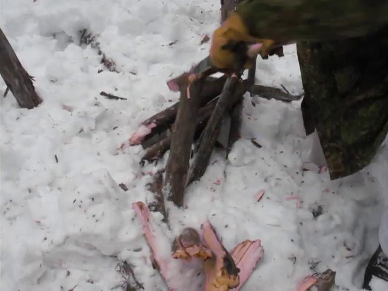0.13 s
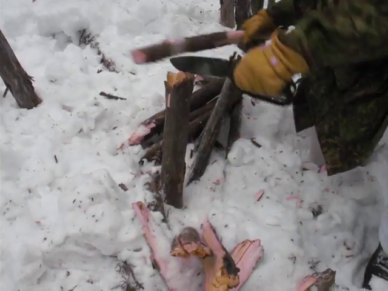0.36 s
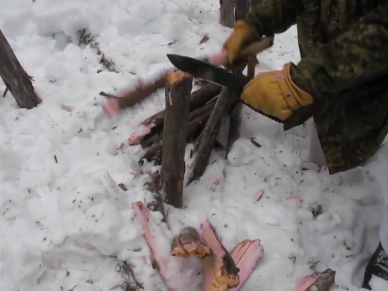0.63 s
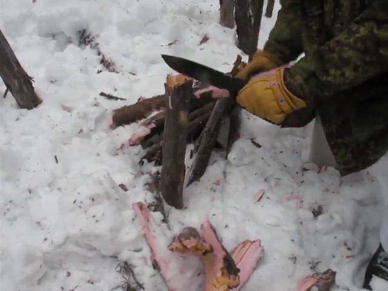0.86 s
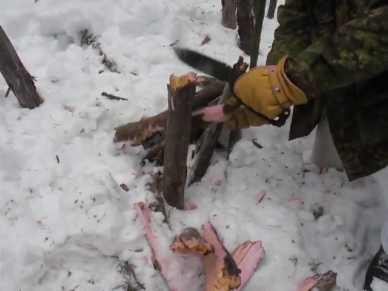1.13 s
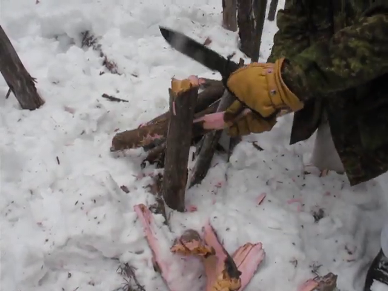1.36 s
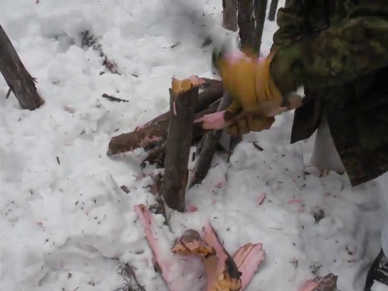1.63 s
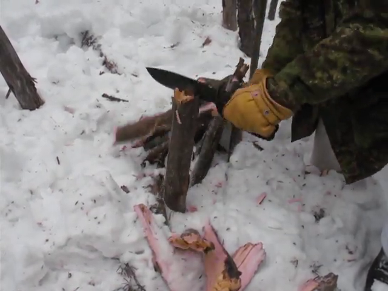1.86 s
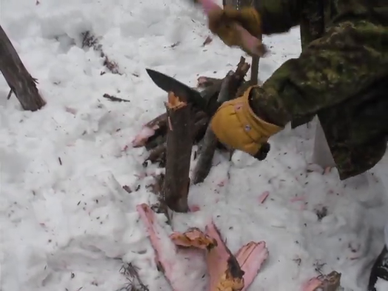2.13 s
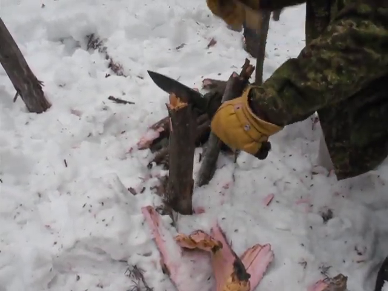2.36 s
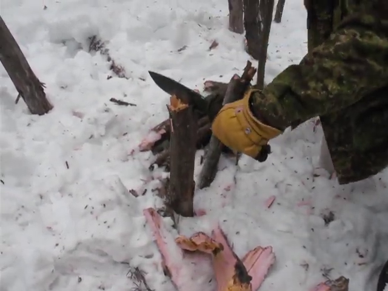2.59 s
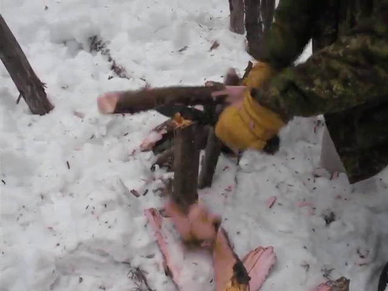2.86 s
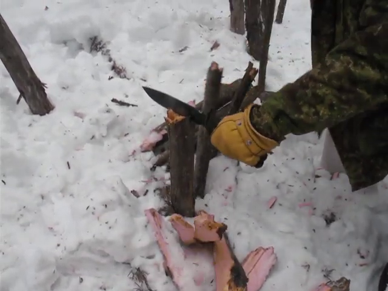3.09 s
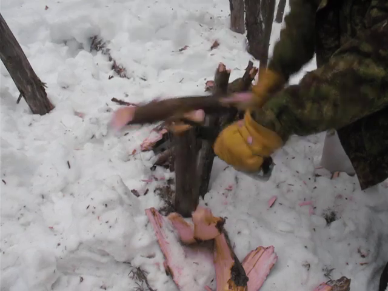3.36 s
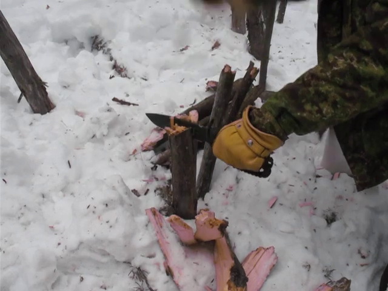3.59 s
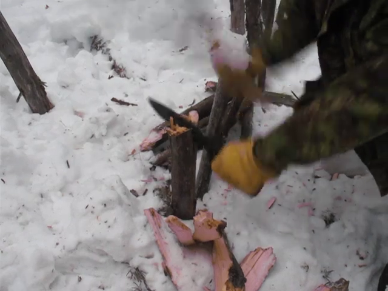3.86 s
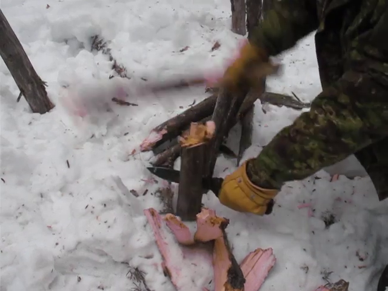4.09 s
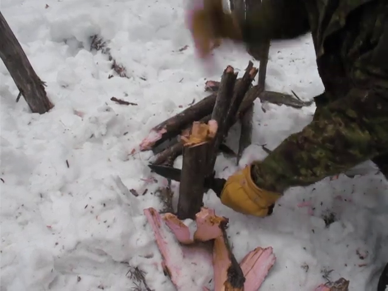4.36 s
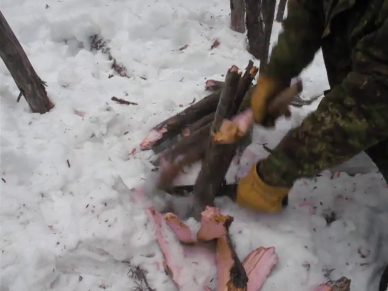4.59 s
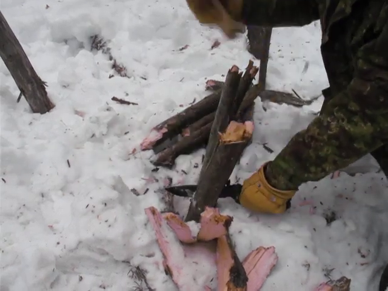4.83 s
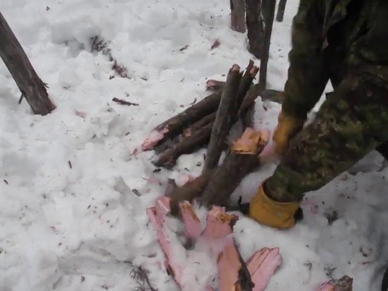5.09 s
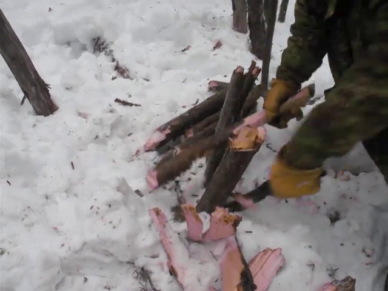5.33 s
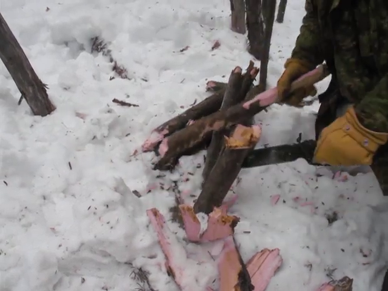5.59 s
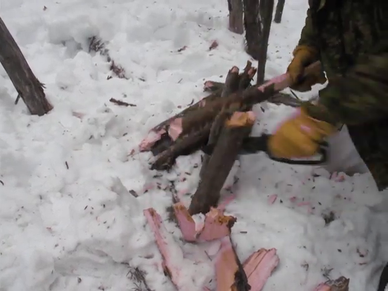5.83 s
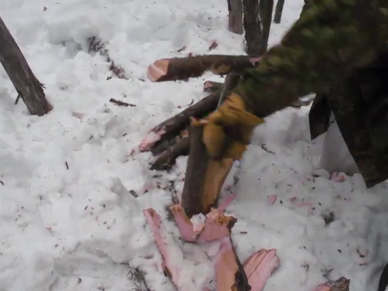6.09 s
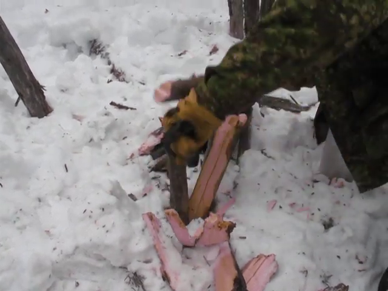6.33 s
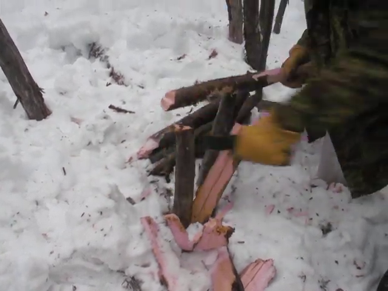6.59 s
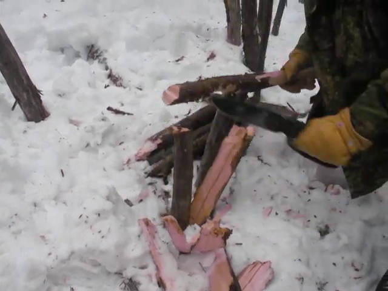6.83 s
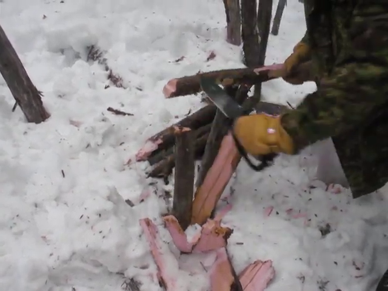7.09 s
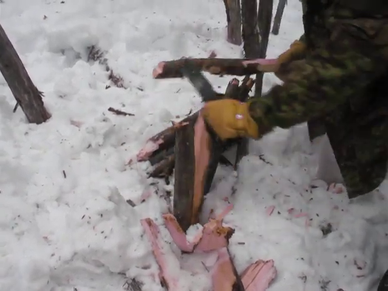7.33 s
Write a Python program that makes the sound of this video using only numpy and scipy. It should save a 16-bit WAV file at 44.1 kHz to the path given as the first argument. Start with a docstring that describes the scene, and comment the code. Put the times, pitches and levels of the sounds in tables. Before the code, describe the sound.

A stick batons a knife through a short log in snow: two light taps, five hard cracking blows, then splintering fibres and glove rustle.

```python
"""Open snowy ground, without echo: a gloved hand batons a large knife down through a short log near a camera.
Two light taps set the blade, then five blows follow, as rough contact noise, decaying log and steel modes and
a thud; the hardest overload the input. Fibres snap as short resonant bursts, bark and cloth crackle in random
ticks, sleeves and gloves rustle as grainy noise, a loose half rings when tapped, and soft thumps land on snow.
A low patter, steady coloured hiss and a thin sine whine lie beneath."""
import sys
import numpy as np
from scipy import signal
from scipy.fft import rfft, irfft, next_fast_len
from scipy.io import wavfile
from scipy.ndimage import uniform_filter1d, map_coordinates

SR = 44100
rng = np.random.default_rng(int(sys.argv[2]) if len(sys.argv) > 2 else 0)


def voltage_ratio(decibels):
    """Convert decibels (scalar or array-like) to amplitude ratios, 20 dB per decade."""
    exponent = np.asarray(decibels, float) / 20
    return 10 ** exponent


def inscribe(sig):
    """Save sig as 16-bit PCM at rate SR to the path in sys.argv[1].

    A 1-D sig is mono; a 2-D sig holds one channel per row.
    Samples are clipped to [-1, 1] before scaling.
    """
    pcm = np.round(np.clip(np.atleast_2d(sig).T, -1, 1) * 32767)
    wavfile.write(sys.argv[1], SR, pcm.astype(np.int16))


N = 328545  # length in samples

# two light taps that set the blade, then five blows of the baton on the knife; dullness (0 to 1) shifts the
# log modes, lengthens the contact and adds thud; spot is the pitch that each one favours
# [start_s, crack_db, knock_db, dullness, spot_hz]
BLOWS = [(0.6976, -4, -31.5, 0, 3050), (1.6774, 2.5, -51, 0.47, 2350), (2.8420, 7.5, -1.5, 0.33, 3050),
         (3.3634, 6.5, -2, 0, 1780), (3.9061, 4.5, -1.5, 0.72, 2350), (4.4687, 2.5, -6.5, 0.77, 1780),
         (5.0593, 2, 1, 0.7, 3050)]
# spectrum of splitting wood [frequency_hz, level_db_per_hz]
SPLITTING = [(60, -48.5), (300, -45), (800, -6.5), (2500, 5.5), (4200, -1), (7000, 1.5), (10000, 1.5),
             (16000, -0.5)]


def unit(x):
    """Normalises the power: x scaled to rms 1."""
    return x / np.sqrt(np.mean(x ** 2) + 1e-20)


def peak(x):
    """Normalises the amplitude: x scaled to a peak of 1."""
    return x / (np.abs(x).max() + 1e-20)


def along(points, hz):
    """Interpolates (Hz, value) points linearly over log frequency."""
    point_hz, value = np.transpose(points)
    return np.interp(np.log(hz + 1), np.log(point_hz + 1), value)


def wobble(rate):
    """Slow random modulation: a spline through normal deviates, rate knots a second."""
    knots = rng.standard_normal(int(N * rate / SR) + 4)
    return map_coordinates(knots, [np.arange(N) * rate / SR])


def coloured(x, points):
    """Minimum-phase filtering: folding the cepstrum makes the (Hz, dB) response causal."""
    size = 2 * next_fast_len(len(x) // 2 + 4096)
    gain = voltage_ratio(along(points, np.fft.rfftfreq(size, 1 / SR)))
    cepstrum = irfft(np.log(gain + 1e-6), size)
    cepstrum[1:size // 2] *= 2
    cepstrum[size // 2 + 1:] = 0
    response = np.exp(rfft(cepstrum))
    return irfft(rfft(x, size) * response, size)[:len(x)]


def flat(x, points):
    """Zero-phase filtering: the (Hz, dB) response changes magnitude alone."""
    size = next_fast_len(N + 8192)
    gain = voltage_ratio(along(points, np.fft.rfftfreq(size, 1 / SR)))
    return irfft(rfft(x, size) * gain, size)[..., :N]


def resonate(x, hz, width_hz):
    """Resonance: a second-order peak whose Q is centre over bandwidth."""
    b, a = signal.iirpeak(min(hz, SR / 2.2), max(hz / width_hz, .3), SR)
    return signal.lfilter(b, a, x)


def grainy(spectrum, per_s, spread_db, grain_db):
    """Granular friction: noise strewn with clumped clicks of uneven size, coloured, rms 1."""
    sizes = voltage_ratio(spread_db * np.minimum(rng.exponential(size=N), 3)) * rng.standard_normal(N)
    chance = per_s / SR * voltage_ratio(5 * wobble(25))  # clicks come in clumps
    clicks = (rng.random(N) < chance) * sizes
    noise = rng.standard_normal(N) + voltage_ratio(grain_db) * unit(clicks)
    return unit(coloured(noise, spectrum))


def patchy(x, patch_db):
    """Time-frequency modulation: drifting patches of louder and softer colour, rms 1."""
    bins = signal.stft(x, SR, nperseg=512)[2]
    patches = rng.standard_normal(bins.shape)
    patches = uniform_filter1d(patches, size=5, axis=0)  # over frequency
    patches = uniform_filter1d(patches, size=8, axis=1)  # over time
    return unit(signal.istft(bins * voltage_ratio(patch_db * unit(patches)), SR, nperseg=512)[1][:N])


def blows():
    """Impact excitation: milliseconds of stuttering contact drive log modes, blade resonances and a thud in snow."""
    # modes of the standing log, at dullness 0 and at dullness 1 [frequency_hz, clear_db, dull_db]
    log_modes = [(624, -22, -1.5), (1073.5, 3.5, -18.5), (1454, -18.5, -9), (1780, -12.5, -20),
                 (2350, -30, -22), (3050, -33, -25.5)]
    # damped resonances of the steel blade [frequency_hz, width_hz, level_db]
    blade_modes = [(5500, 950, -15), (8600, 1100, -5)]
    favour_db, favour_octaves = 16.5, 0.51  # lift of the modes near the favoured pitch, and its reach
    contact_t60_s, dull_longer = .0115, .45  # dullness lengthens the contact
    thud_db, thud_dull_db = -33.5, 28.5  # push into the snow; its gain at full dullness
    free_steel_db = 3.5  # a clear blow has more ring of steel
    out, t = np.zeros(N + SR), np.arange(SR // 8) / SR
    mode_hz, clear_db, dull_db = np.transpose(log_modes)
    for start, crack_db, knock_db, dullness, spot_hz in BLOWS:
        # contact builds, then lets go
        contact_s = contact_t60_s * (1 + dull_longer * dullness)
        push = peak((1 - np.exp(-t / 0.0005)) * voltage_ratio(-60 * (t / contact_s) ** 2))
        # chips and snow banks trail behind
        fading = push + voltage_ratio(-13 - 60 * t / .03) + voltage_ratio(-30 - 60 * t / .1)
        # the level jumps every 30 samples
        stutter = voltage_ratio(2.2 * np.repeat(rng.standard_normal(len(t) // 30 + 1), 30)[:len(t)])
        crack = coloured(fading * stutter * rng.standard_normal(len(t)), SPLITTING)
        steel = np.zeros(len(t))
        for hz, width_hz, level_db in blade_modes:
            ring_db = level_db + free_steel_db * (0.5 - dullness)
            steel += voltage_ratio(ring_db) * resonate(crack, hz, width_hz)
        # rough contact smears the phase of each mode
        slip = np.cumsum(rng.normal(0, .14, (len(log_modes), len(t))), axis=1)
        favoured_db = favour_db * np.exp(-(np.log2(mode_hz / spot_hz) / favour_octaves) ** 2)
        mode_gain = voltage_ratio(clear_db + dullness * (dull_db - clear_db) + favoured_db)
        knock = mode_gain @ (fading * np.sin(2 * np.pi * np.outer(mode_hz, t) + slip))
        wood = voltage_ratio(crack_db) * peak(crack + steel) + voltage_ratio(knock_db) * knock
        # a clear blow gives less bass
        b, a = signal.butter(2, 750 - 450 * dullness, "high", fs=SR)
        wood = signal.lfilter(b, a, wood)
        u = t / 0.00036
        pulse = u * (2 - u) * np.exp(-u)
        thud = pulse + 0.74 * np.sin(2 * np.pi * 190 * t) * voltage_ratio(-60 * t / 0.016)
        out[round(start * SR):][:len(t)] += wood + voltage_ratio(thud_db + thud_dull_db * dullness) * thud
    return out[:N]


def snaps():
    """Brittle fracture: each tearing fibre is a short burst, strongest near its own pitch, with a wood body."""
    # fibre snaps and small contacts; body is relative to the snap [start_s, level_db, pitch_hz, body_db]
    fibres = [(0.8283, -25, 2350, -26), (0.8677, -29, 2180, -21), (0.9803, -20.5, 8600, -13.5),
              (1.035, -27, 10100, -21), (1.07, -28.5, 2260, -25), (1.153, -26, 2100, -4.5),
              (1.7443, -27, 5900, -34), (2.952, -22.5, 2240, -11), (3.167, -31, 7240, -26),
              (3.3668, -6, 1600, -10), (3.457, -21, 4560, -20), (3.8115, -10.5, 10230, -23.5),
              (3.8432, -19.5, 6500, -20), (3.9122, -5, 2580, -9), (3.9205, -8, 7800, -11),
              (3.9255, -7, 8600, -21), (3.9312, -6.5, 2420, -19), (3.938, -12, 9300, -30.5),
              (3.9416, -16, 8950, -37), (3.9725, -24, 9650, -81), (4.3542, -18, 2600, -9.5),
              (4.3984, -21, 9700, -17), (4.4299, -25.5, 3400, -9), (4.4721, -8, 9400, -7),
              (4.4816, 0, 5720, -15), (4.4823, -8, 2700, -31), (4.523, -7, 8600, -48),
              (4.6413, -25, 8600, -11), (4.739, -30.5, 3660, -11.5), (4.852, -17, 9900, -37.5),
              (5, -25, 2520, -21), (5.074, -34, 7400, 3), (5.097, -19.5, 8360, -71),
              (5.1264, -25.5, 8500, -63), (5.1881, -15, 6100, -37), (5.221, -10, 8200, -17),
              (5.23, -16, 9600, -34), (5.2469, -14.5, 10000, -28), (5.2912, -22, 9800, -24),
              (5.3592, -17, 9000, -11), (5.504, -22, 2900, -11), (5.5386, -21.5, 9650, -8.5),
              (5.563, -17.5, 2280, -32), (5.6081, -18.5, 8400, -12), (5.6402, -10.5, 9900, -46),
              (5.706, -21, 9800, -30), (5.7334, -20, 9100, -43), (5.834, -19, 2060, -18),
              (5.839, -22.5, 7900, -9), (5.9393, -11, 1900, -44), (5.978, -5, 2500, -21),
              (5.984, -14, 2120, -11), (6.0029, -14, 1870, -41), (6.02, -20, 3000, -33),
              (6.042, -13.5, 7800, -18), (6.0592, -10, 3200, -12), (6.0681, -7.5, 1760, -23),
              (6.0737, -5.5, 9800, -37), (6.1148, -22.5, 9400, -13), (6.191, -7, 9000, -13.5),
              (6.2995, -24, 9600, -29), (6.3266, -21, 5940, -34), (6.529, -31, 2020, 0.5),
              (7.167, -19, 7600, -34), (7.3928, -20.5, 8640, -32)]
    out, t = np.zeros(N + SR), np.arange(SR // 25) / SR
    for start, level_db, hz, body_db in fibres:
        t60 = .009 * (hz / 8000) ** -.4  # thin fibres snap higher and shorter
        burst = (1 - np.exp(-t / 0.000067)) * (voltage_ratio(-60 * t / t60) + voltage_ratio(-21 - 60 * t / .05))
        noise = rng.standard_normal((2, len(t))) * burst
        noise[:, 6] += 3  # the break itself is one sharp step
        crack = coloured(noise[0], SPLITTING)
        b, a = signal.butter(1, hz / 3, "high", fs=SR)
        broad = signal.lfilter(b, a, crack)
        bright = peak(voltage_ratio(-7.5) * broad + resonate(crack, hz, width_hz=hz / 4))
        wood = peak(resonate(noise[1], 900, width_hz=1200))
        out[round(start * SR):][:len(t)] += voltage_ratio(level_db) * (bright + voltage_ratio(body_db) * wood)
    return out[:N]


def crackle():
    """Random point process: bark and stiff cloth give way in short ticks, half bright, half woody."""
    # runs of tiny ticks [start_s, end_s, ticks_per_s, level_db]
    runs = [(0.097, .37, 140, -36), (.696, 0.753, 120, -30), (0.792, 1.2, 80, -36.5), (1.38, 1.47, 60, -42),
            (1.73, 1.8, 80, -36), (1.92, 2.073, 55, -43), (2.915, 3.07, 80, -33), (3.935, 4.03, 120, -33),
            (4.57, 4.65, 300, -29.5), (5.15, 5.76, 390, -42.5), (5.802, 5.85, 200, -32),
            (5.94, 6.124, 530, -29), (7.144, 7.2, 200, -33.5), (7.27, 7.45, 150, -36.5)]
    t, ticks = np.arange(N) / SR, np.zeros((2, N))
    draw = rng.random((2, N))
    sizes = voltage_ratio(3.5 * np.minimum(rng.exponential(size=(2, N)), 2.5))
    for start, end, per_s, level_db in runs:
        struck = (t > start) * (t < end) * (draw < per_s / SR / 2)
        ticks += struck * sizes * voltage_ratio(level_db)
    grain = signal.lfilter([1], [1, -.93], ticks) * rng.standard_normal((2, N))  # each tick decays as noise
    bright = voltage_ratio(1) * resonate(coloured(grain[0], SPLITTING), 11800, width_hz=12000)
    woody = resonate(resonate(grain[1], 2200, width_hz=450), 2200, width_hz=900)
    return bright + voltage_ratio(9) * woody


def swell(start, held, db, rise=128):
    """Exponential growth and decay: power rises straight in dB (rise dB/s), holds, then falls straight."""
    t = np.arange(N) / SR
    before_s = np.maximum(start - t, 0)
    after_s = np.maximum(t - start - held, 0)
    return voltage_ratio(2 * (db - rise * before_s - 143 * after_s))  # falls 143 dB/s


def activity():
    """Addition of powers: gains of rustle and scrape from the movements plus arm swing and recoil at each hit."""
    # movements of arms and gloves; scrape is relative to rustle [start_s, held_s, rustle_db, scrape_db]
    gestures = [(0.01, 0.15, -50.5, -8), (.17, 0.12, -44.5, -10), (.45, 0.13, -58, -3.5),
                (.72, .12, -48.5, -9), (.9, 0.19, -52, -3), (1.43, 0.016, -64, -3.5),
                (1.7, 0.055, -52, -12.5), (1.94, 0.33, -51.5, -6.5), (2.38, .08, -54, -6.5),
                (2.58, 0.047, -53.5, -4), (3.1, 0.04, -52.5, -5.5), (3.62, 0.34, -51.5, -5),
                (4.08, 0.25, -56.5, -7), (4.739, 0.063, -48.5, -6), (5.21, 0.045, -45, -9.5),
                (5.3, 0.12, -43, -6.5), (5.38, 0.026, -41, -6.5), (5.47, 0.12, -43.5, -4.5),
                (5.71, 0.037, -47.5, -16), (5.79, 0.056, -51, -0.5), (5.9, 0.21, -46, -10),
                (6.2, 0.12, -45.5, -5.5), (6.45, 0.14, -52, -6), (6.699, 0.022, -43, -6.5),
                (6.952, 0.017, -44, -7.5), (7.159, 0.016, -47, -5.5), (7.37, .1, -48.5, -2)]
    swing_db, swing_db_per_s = -41.5, 77  # the sleeve swells into each tap or blow
    recoil_s, recoil_db = 0.093, -48  # and again as the arm comes back
    arm_follows, arm_scrape_db = 0.28, -5.5  # dB of sleeve per dB of knock; scrape over rustle
    rustle, scrape = voltage_ratio(2 * -64), voltage_ratio(2 * -88)  # powers of cloth and gloves at rest
    for start, held, rustle_db, scrape_db in gestures:
        move = swell(start, held, rustle_db)
        rustle = rustle + move
        scrape = scrape + voltage_ratio(2 * scrape_db) * move
    for start, _, knock_db, *_ in BLOWS:
        effort_db = arm_follows * knock_db
        swing = swell(start, 0.0067, swing_db + effort_db, swing_db_per_s)
        recoil = swell(start + recoil_s, 0.09, recoil_db + effort_db)
        rustle = rustle + swing + recoil
        scrape = scrape + voltage_ratio(2 * arm_scrape_db) * (swing + recoil)
    return np.sqrt(rustle), np.sqrt(scrape)


def moves():
    """Friction noise: stiff cloth rustles high, gloves and bark scrape lower, over a lumpy low rumble."""
    # stiff cloth, before scaling to rms 1 [frequency_hz, level_db_per_hz]
    cloth_spectrum = [(1800, -41), (3000, -20), (3900, -6.5), (5000, -4), (7000, -2.5), (9500, 3),
                      (11000, 1.5), (12500, 3), (16000, -6.5)]
    # gloves and bark, before scaling to rms 1 [frequency_hz, level_db_per_hz]
    scrape_spectrum = [(240, -31.5), (520, -2.5), (850, -5.5), (1500, -3.5), (2300, -3.5), (3200, -3),
                       (4200, -12), (8000, -59)]
    # low rumble, before scaling to rms 1 [frequency_hz, level_db_per_hz]
    rumble_spectrum = [(12, -6), (20, -2), (114, -13), (307, -14.5), (344, -14.5), (600, -19), (780, -63),
                       (1320, -120)]
    ground_db, ground_moved_db = -71, -12  # rumble at rest; under the scrape
    rustling, scraping = activity()
    flutter = voltage_ratio(1.3 * np.array([wobble(25), wobble(25)]) + 1.2 * wobble(80))
    cloth = patchy(grainy(cloth_spectrum, 1100, spread_db=2, grain_db=-1.0), patch_db=2.1)
    rub = patchy(grainy(scrape_spectrum, 370, spread_db=1.0, grain_db=-5.5), patch_db=3.0)
    lumps = voltage_ratio(6.6 * wobble(17))
    ground = np.hypot(voltage_ratio(ground_db), voltage_ratio(ground_moved_db) * scraping)
    bumps = ground * lumps * grainy(rumble_spectrum, 20, spread_db=4, grain_db=-9)
    return rustling * flutter[0] * cloth + scraping * flutter[1] * rub + bumps


def tap():
    """Modal ringing: a light tap sets the loose split half vibrating in damped sines."""
    # the tap on the half log [start_s, level_db]
    touch = (7.0202, -18)
    # modes of the half log [frequency_hz, level_db, t60_s]
    half_modes = [(743, -16.5, 0.077), (950, -4.5, 0.028), (1477, -9, 0.065), (2140, 9.5, 0.0058),
                  (2560, -6.5, 0.034), (3290, -5.5, 0.026)]
    out, t = np.zeros(N + SR), np.arange(SR // 6) / SR
    start, tap_db = touch
    ring = np.zeros(len(t))
    for hz, level_db, t60 in half_modes:
        ring += voltage_ratio(level_db - 60 * t / t60) * np.sin(2 * np.pi * hz * t)
    ring *= 1 - np.exp(-t / 0.0006)  # soft onset
    tick = coloured(voltage_ratio(-60 * t / 0.026) * rng.standard_normal(len(t)), SPLITTING)
    out[round(start * SR):][:len(t)] = voltage_ratio(tap_db) * (ring + voltage_ratio(1.0) * peak(tick))
    return out[:N]


def thumps():
    """Damped impact: soft contacts start slowly and give a few dull cycles of resonant noise."""
    # thumps of log and gloves on snow [start_s, peak_db, pitch_hz]
    contacts = [(1.124, -44, 170), (1.237, -52, 530), (2.947, -42.5, 74), (3.451, -44, 81),
                (4.631, -37.5, 454), (5.208, -41.5, 563), (5.539, -39, 613), (5.823, -36, 500),
                (6.149, -52, 73), (6.52, -42.5, 510), (7.258, -47, 152)]
    out, t = np.zeros(N + SR), np.arange(SR // 8) / SR
    for start, peak_db, hz in contacts:
        puff = (1 - np.exp(-t / 0.01)) * voltage_ratio(-60 * t / 0.052) * rng.standard_normal(len(t))
        dull = resonate(resonate(puff, hz, width_hz=hz / 1.7), hz, width_hz=hz / 1.7)
        out[round(start * SR):][:len(t)] += voltage_ratio(peak_db) * peak(dull)
    return out[:N]


def patter():
    """Jittered pulse train: faint, uneven low pulses convolved with one pulse shape run under everything."""
    rate_per_s, loudest_db, scale_s = 12, -54, .003
    count = int(rate_per_s * N / SR)
    draw = rng.random((count, 2))
    place = ((np.arange(count) + draw[:, 0]) / count * N).astype(int)  # one in each equal slot
    pulses = np.zeros(N)
    pulses[place] = -voltage_ratio(loudest_db - 7.3 * draw[:, 1])
    u = np.arange(SR // 20) / SR / scale_s
    shape = peak(u * (2 - u) * np.exp(-u))
    return signal.fftconvolve(pulses, shape)[:N]


def camera():
    """Stationary noise and a pure tone: the camera's steady coloured hiss and its thin, slightly uneven whine."""
    # the hiss, before scaling to rms 1 [frequency_hz, level_db_per_hz]
    hiss_spectrum = [(20, -3), (70, -1.5), (340, -10.5), (530, -2.5), (2000, -8.5), (5000, -18),
                     (9500, -31), (12500, -6.5), (16000, -10.5)]
    # the whine [frequency_hz, rms_db]
    tone = (5880, -65)
    hz, rms_db = tone
    level = np.sqrt(2) * voltage_ratio(rms_db + 0.46 * wobble(3.4))
    whine = level * np.sin(2 * np.pi * hz * np.arange(N) / SR)
    hiss = voltage_ratio(-62.5) * unit(coloured(rng.standard_normal(N), hiss_spectrum))
    return hiss + whine


def scene():
    """Superposition: the pressures of all sources add in one channel."""
    wood = blows() + snaps() + crackle() + tap()
    handling = moves() + thumps()
    return (wood + handling + patter() + camera())[None]


def low_pass(x):
    """Removes everything above the highest recorded frequency."""
    return signal.sosfilt(signal.butter(12, 16710, fs=SR, output="sos"), x)


def record(dry):
    """Saturation and band limiting: the input clips the hardest blows at 0.6 and dulls the top octave."""
    # response of the camera input [frequency_hz, gain_db]
    input_response = [(20, -3), (150, 0), (10000, 0), (11200, -9), (11750, -30), (12400, -15), (15400, -15),
                      (15900, -32), (16600, -45), (17000, -90)]
    clipped = dry / (1 + np.abs(dry / .6) ** 10) ** (1 / 10)
    mix = flat(clipped, input_response)
    return low_pass(mix)


dry = scene()
out = record(dry)
inscribe(out)
```